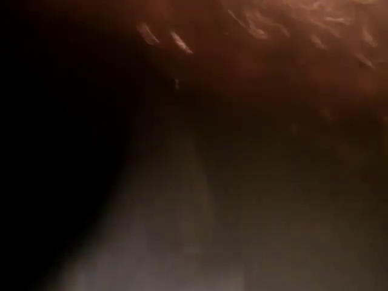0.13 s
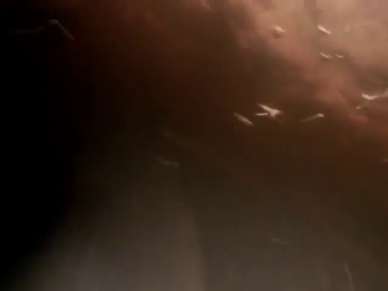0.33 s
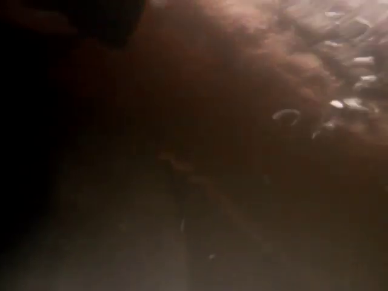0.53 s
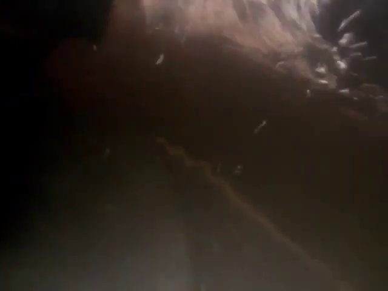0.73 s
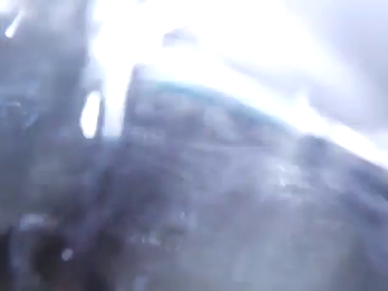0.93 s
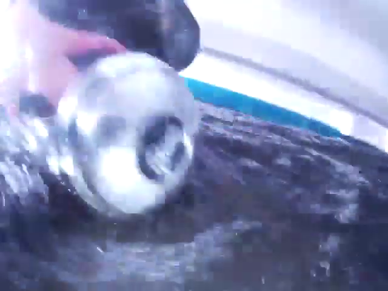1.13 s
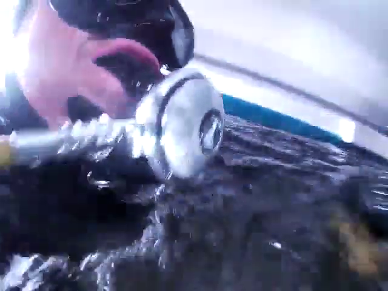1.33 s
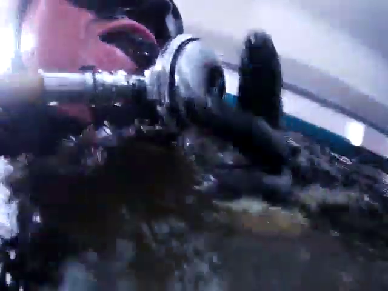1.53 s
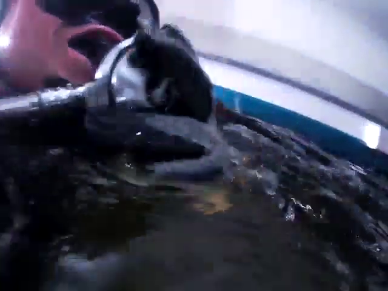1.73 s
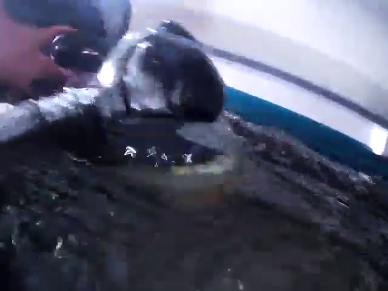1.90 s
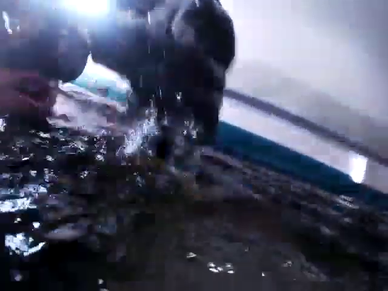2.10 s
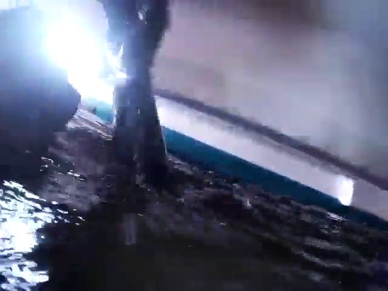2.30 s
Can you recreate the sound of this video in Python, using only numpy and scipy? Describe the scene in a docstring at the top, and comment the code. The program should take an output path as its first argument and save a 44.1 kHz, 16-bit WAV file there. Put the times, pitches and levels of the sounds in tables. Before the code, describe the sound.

Bubbling water, dull and rumbling, is heard close up from underwater. The microphone surfaces with a brief wash of runoff, and the sound turns brighter: small splashes and plops around a diver's equipment, then a light trickle.

```python
"""Churning water around a camera in a waterproof housing, which breaks the surface at about 0.9 s.
Below, bubbles ring as damped sines: large ones gurgle dully through the housing, tiny ones tick.
A thin whistle sounds near the surface, then the water drains off. Above, water sloshes and plops
around a diver's gear and a thin stream trickles down. Moving water rocks the housing throughout."""
import sys
import numpy as np
from scipy import signal
from scipy.fft import rfft, irfft
from scipy.io import wavfile
from scipy.ndimage import uniform_filter1d

SR = 44100
rng = np.random.default_rng(int(sys.argv[2]) if len(sys.argv) > 2 else 0)


def unload_audio(sound):
    """Save the sound as a 16-bit wav file, at the path given as the first command line argument."""
    columns = np.transpose(np.atleast_2d(sound))
    # keep every value between -1 and 1, then stretch to whole-number steps
    steps = np.round(np.clip(columns, -1, 1) * 32767)
    wavfile.write(sys.argv[1], SR, steps.astype(np.int16))


N = 108265
TIME_S = np.arange(N) / SR
SWELL_CYCLES, DEEP_SWELL_CYCLES, TICK_SWELL_CYCLES = 0.68, 2.24, 2.0
TICK_DECAY_S, GLIDE_PER_S = 0.0017, 0.21
WHISTLE_WOBBLE_HZ, WHISTLE_FLUTTER_DB = 217, 0.5
FADE_DB_PER_S, CUTOFF_HZ = 250, 14800

# Loudness of the bubble swarms. Each row: time in seconds, level in dB.
CHURN_LEVELS = [(0, -28), (.08, -32), (.14, -29), (.21, -35.5), (.3, -30), (.33, -29), (.39, -28),
                (.45, -32.5), (.51, -27), (.6, -29), (.67, -30), (.72, -36.5), (.77, -46), (.9, -54.5)]
FROTH_LEVELS = [(0, -58), (.06, -57), (.12, -53), (.2, -56), (.26, -50), (.285, -54), (.36, -52),
                (.44, -55), (.5, -44), (.62, -43), (.68, -41), (.74, -46), (.85, -51), (.95, -65)]
FIZZ_LEVELS = [(0, -69), (.18, -69), (.26, -66), (.36, -67), (.45, -70), (.6, -68), (.66, -64), (.72, -68),
               (.82, -73), (.95, -76)]
DRAIN_LEVELS = [(.72, -47.5), (.82, -54), (.92, -43.5), (1.01, -38), (1.07, -42), (1.11, -50.5),
                (1.16, -53.5), (1.24, -67)]
SLOSH_LEVELS = [(.95, -50.5), (1.18, -49.5), (1.25, -46), (1.33, -32.5), (1.42, -35), (1.48, -35),
                (1.53, -32.5), (1.61, -40), (1.68, -37), (1.74, -39.5), (1.83, -41), (1.9, -44),
                (1.95, -47), (2.02, -46), (2.16, -47.5), (2.3, -51), (2.37, -51.5), (2.43, -42)]
SPRAY_LEVELS = [(1.15, -67), (1.33, -70), (1.44, -53), (1.52, -52.5), (1.61, -64), (1.66, -53), (1.76, -73),
                (1.88, -66), (2.03, -68), (2.15, -65), (2.33, -71), (2.43, -57.5)]
# Filters that colour the swarms and noises. Each row: frequency in Hz, relative gain in dB.
CHURN_EQ = [(150, -20.5), (260, -5.5), (330, -4.5), (400, 2.5), (520, 1.5), (700, 3.5), (820, -6.5),
            (1000, -18), (1200, -39), (2000, -54.5), (4000, -90.5), (12000, -110)]
FROTH_EQ = [(600, -42.5), (1050, 13), (1300, 13.5), (1850, 6.5), (2050, -3.5), (2300, -8.5), (2700, -35),
            (3100, -25.5), (3800, -43.5), (6000, -58.5), (15000, -91)]
FIZZ_EQ = [(1500, -29), (2500, -3.5), (3100, 0.5), (3900, -15), (4600, -8.5), (5300, 0.5), (6300, -2),
           (7300, -2), (8700, -6.5), (10000, -5.5), (12000, -9.5), (13500, -29.5), (15000, -37)]
SWAY_EQ = [(3, -12.5), (10, 9), (16, -11.5), (30, 5.5), (55, -9), (90, -27.5), (200, -71.5), (1000, -110)]
RUMBLE_EQ = [(35, -13.5), (70, -2), (110, -2.5), (160, -7.5), (215, -2.5), (270, -14), (380, -28),
             (900, -31.5), (3000, -79.5), (10000, -120)]
SPATTER_EQ = [(500, -5), (2000, -8.5), (5000, 7), (8000, -14), (10500, -6), (13000, -26), (15000, -31)]
DRAIN_EQ = [(200, -5.5), (330, -0.5), (420, -15.5), (580, 4.5), (850, 2), (1150, -8), (1700, -7.5),
            (2500, -29.5), (4500, -25.5), (7000, -41.5), (10000, -42.5), (15000, -69)]
SLOSH_EQ = [(200, -1), (380, -15), (600, -12), (850, -3.5), (1100, -7.5), (1500, 3), (1900, 2),
            (2500, -4.5), (3500, -14), (5000, -23.5), (7000, -25), (10000, -40), (11500, -38.5),
            (15000, -72)]
SPRAY_EQ = [(1500, -23), (3500, -12), (5000, 9), (7000, -5), (10000, -4.5), (11500, -23), (13500, -19),
            (15000, -40)]
# Sustained tones. Each row: time in seconds, pitch in Hz, level in dB.
THROB_TRACK = [(0, 192, -16.5), (.02, 196, -16), (.04, 198, -17), (.055, 200, -36), (.075, 190, -27),
               (.09, 180, -45)]
WHISTLE_TRACK = [(.63, 7800, -85), (.66, 7700, -63), (.71, 6900, -72), (.77, 7500, -66), (.805, 7700, -80),
                 (.83, 7700, -64), (.88, 7250, -60), (.915, 7600, -63), (.94, 7300, -82)]
TRICKLE_TRACK = [(1.88, 1464, -60), (1.94, 1460, -44), (2.0, 1465, -45), (2.06, 1491, -42),
                 (2.14, 1502, -38), (2.21, 1506, -43), (2.28, 1488, -47), (2.36, 1400, -58)]
# Flow pressing on the housing. Each row: time in seconds, sway level in dB, rumble level in dB.
FLOW_LEVELS = [(0, -43, -21.5), (.1, -29.5, -28), (.3, -36.5, -28), (.45, -32, -35), (.6, -30.5, -29.5),
               (.79, -31, -37), (.88, -35, -42), (1.02, -37.5, -39), (1.18, -40, -52.5), (1.33, -36, -41),
               (1.46, -37, -40), (1.56, -38.5, -47), (1.8, -42.5, -49), (2.05, -35, -52.5),
               (2.16, -47, -52.5), (2.25, -32.5, -52.5), (2.32, -49, -57.5), (2.4, -27.5, -50)]
# Damped rings. Each row: start in seconds, pitch in Hz, peak level in dB, decay in seconds.
DEEP_BUBBLES = [(.048, 679, -22.5, 0.01), (.055, 682.4, -16.5, 0.0086), (.117, 897, -33, 0.023),
                (.14, 1005, -37, 0.013), (.304, 393, -19, 0.0023), (.315, 701, -12, .005),
                (.3247, 653, -21, 0.0089), (.327, 403, -20, 0.014), (.489, 1765, -37.5, .009),
                (.502, 605, -18.5, 0.0062), (.512, 1766, -38.5, 0.019), (.527, 710, -18, 0.0063),
                (.535, 1510, -41, .012), (.563, 611, -13.5, 0.0055), (.597, 717, -17, 0.0054),
                (.651, 1845, -22.5, 0.011), (.654, 750, -17, 0.0028), (.6632, 1700, -32, 0.0055),
                (.7023, 1305, -28, 0.011), (.773, 1390, -45, 0.027)]
SHOVES = [(.73, 25.5, -22.5, 0.027), (1.297, 26, -22.5, 0.049), (2.387, 48, -26.5, 0.0093),
          (2.391, 220, -28, 0.006)]  # swells hitting the housing
PLOPS = [(1.244, 1680, -26.5, 0.0091), (1.2758, 1480, -18, 0.00085), (1.276, 3370, -20, 0.0032),
         (1.317, 990, -23, 0.0073), (1.3525, 1618, -10, 0.0063), (1.37, 1620, -9, 0.0013),
         (1.3716, 2560, -16.5, 0.00055), (1.3764, 2680, -25, 0.0016), (1.3893, 2105, -15.5, 0.005),
         (1.3893, 1500, -19, 0.0026), (1.392, 1655, -27, 0.0071), (1.3979, 1120, -16.5, 0.0072),
         (1.3986, 1443, -6.5, 0.0019), (1.4013, 1537, -13.5, 0.0044), (1.4618, 2790, -26, 0.0026),
         (1.497, 1365, -24.5, 0.0045), (1.512, 1800, -23.5, 0.0067), (1.533, 1137, -23.5, 0.007),
         (1.5346, 1567, -25.5, 0.0092), (1.5685, 1232, -18, 0.013), (1.5686, 1110, -24.5, 0.0077),
         (1.569, 2700, -27.5, .002), (1.624, 1480, -32, 0.021), (1.6486, 1514, -20, .013),
         (1.648, 2300, -20, 0.0021), (1.672, 1850, -24, 0.007), (1.6852, 1544, -25, 0.012),
         (1.7409, 1338, -37.5, 0.037), (1.9288, 1450, -27, 0.0068), (1.9393, 2562, -28.5, 0.0039),
         (1.9537, 1553, -30, 0.0064), (2.3901, 1690, -23.5, 0.0012), (2.3982, 1835, -26.5, 0.0045),
         (2.424, 2100, -32.5, 0.0021)]
# Tiny bubbles and droplets. Each row: start in seconds, level in dB, pitch in Hz.
TICKS = [(.083, -58, 8000), (.104, -54, 3180), (.203, -45, 6220), (.224, -55, 6060), (.242, -56, 8500),
         (0.259, -47.5, 2550), (.267, -51, 5130), (.299, -51, 4460), (.313, -52, 3280), (.351, -44, 7740),
         (.354, -51.5, 2920), (.354, -53, 4580), (.3675, -51.5, 7200), (.391, -54, 8200),
         (.4095, -49, 8860), (.424, -57.5, 3100), (.488, -50.5, 6900), (.501, -47.5, 5060),
         (.586, -53.5, 8900), (.638, -36.5, 7310), (0.653, -37.5, 2910), (0.652, -39.5, 4870),
         (.707, -41.5, 5260), (0.712, -48.5, 2900), (.74, -62, 4760), (1.229, -42, 4530),
         (1.275, -38.5, 5600), (1.349, -50, 6700), (1.424, -42, 5900), (1.461, -34.5, 5900),
         (1.5134, -31, 7070), (1.529, -37, 4660), (1.5508, -30.5, 4040), (1.734, -47, 8100),
         (2.012, -40, 5600), (2.424, -44.5, 4900)]
# Sudden bursts. Each row: start in seconds, level in dB, decay in seconds.
BREAKUPS = [(.298, -33, 0.0074), (.32, -46, 0.0089), (.651, -36, 0.022)]  # air pockets breaking into froth
SPATTERS = [(.299, -55.5, 0.0022), (.652, -53, 0.0059), (1.2755, -51, 0.0018), (1.3485, -34, 0.0013),
            (1.513, -38, .004), (1.733, -49, 0.015), (2.0115, -53, 0.0028), (2.022, -47.5, 0.0069),
            (2.397, -49, 0.0026), (2.424, -43, 0.0024)]
SLAPS = [(1.243, -40.5, 0.013), (1.456, -36, 0.014), (1.648, -24.5, .017), (1.937, -37.5, 0.0086)]
# Filling air pockets. Each row: start and length in seconds, first and last pitch in Hz, level in dB.
GULPS = [(.33, 0.0995, 401.8, 477.5, -28), (0.469, 0.1, 370, 522.5, -27.5), (.56, 0.15, 520, 745, -28.5),
         (0.931, 0.065, 570, 611, -39.5), (1.47, .14, 543, 786, -38.5), (1.723, 0.182, 763, 778, -51),
         (2.162, 0.11, 480, 475, -56.5)]


def amp(db):
    """Decibels to gain."""
    return 10 ** (np.asarray(db) / 20)


def unit(x):
    """Scale to rms 1."""
    return x / np.sqrt(np.mean(x ** 2) + 1e-20)


def curve(rows, column=1):
    """One table column, interpolated over time."""
    rows = np.array(rows)
    return np.interp(TIME_S, rows[:, 0], rows[:, column])


def level(rows, column=1):
    """Gain from a dB curve, fading outside its span."""
    outside_s = np.maximum(rows[0][0] - TIME_S, 0) + np.maximum(TIME_S - rows[-1][0], 0)
    return amp(curve(rows, column) - FADE_DB_PER_S * outside_s)


def colour(x, eq):
    """Minimum-phase filter."""
    size = 2 ** 17
    hz, db = np.transpose(eq)
    bin_hz = abs(np.fft.fftfreq(size, 1 / SR))
    gain = amp(np.interp(np.log(bin_hz + 1), np.log(hz), db))
    response = np.exp(np.conj(signal.hilbert(np.log(gain))))[:size // 2 + 1]
    return irfft(rfft(x, size) * response)[:N]


def steady(x, span_s):
    """Hold rms near 1, keeping detail quicker than the span."""
    size = max(8, int(span_s * SR))
    power = uniform_filter1d(uniform_filter1d(x * x, size), size)
    return x / np.sqrt(abs(power) + 1e-12)


def wander(rate_hz):
    """Smooth noise of rms 1."""
    hz = np.fft.rfftfreq(N, 1 / SR)
    return unit(irfft(rfft(rng.standard_normal(N)) * np.exp(-(hz / rate_hz) ** 2), N))


def ring(hz, decay_s, swell_cycles):
    """One bubble: a damped sine that swells to peak 1 and creeps up in pitch."""
    t = np.arange(int(9 * decay_s * SR) + 8) / SR
    envelope = (1 - np.exp(-(t * hz / swell_cycles) ** 2)) * np.exp(-t / decay_s)
    return envelope / envelope.max() * np.sin(2 * np.pi * hz * (t + GLIDE_PER_S * t * t / 2))


def rings(rows, swell_cycles):
    """One damped ring per row."""
    out = np.zeros(N)
    for start_s, hz, db, decay_s in rows:
        sound = amp(db) * ring(hz, decay_s, swell_cycles)
        slot = out[round(start_s * SR):][:len(sound)]
        slot += sound[:len(slot)]
    return out


def swarm(eq, low_hz, high_hz, per_s, decay_cycles, spread_db, hiss):
    """Random bubbles of 36 sizes over turbulent hiss, rms near 1."""
    bubbles = np.zeros(N)
    for hz in np.geomspace(low_hz, high_hz, num=36):
        born = rng.random(N) < per_s / 36 / SR
        strength_db = spread_db * np.minimum(rng.exponential(1, N), 3.5)
        kicks = born * amp(strength_db) * rng.choice([-1, 1], N)
        bubble = ring(hz, decay_cycles / hz, SWELL_CYCLES)
        bubbles += np.sqrt(hz) * unit(signal.oaconvolve(kicks, bubble)[:N])
    turbulence = hiss * rng.standard_normal(N) * np.sqrt(SR / 2 / (high_hz - low_hz))
    return steady(colour(unit(bubbles) + turbulence, eq), span_s=0.047)


def bursts(rows, attack_s):
    """Envelope of sudden, decaying blows."""
    out = np.zeros(N)
    for start_s, db, decay_s in rows:
        age_s = np.maximum(TIME_S - start_s, 0)
        out += amp(db) * (1 - np.exp(-age_s / attack_s)) * np.exp(-age_s / decay_s)
    return out


def fuzzy_tone(pitch_hz, width_hz):
    """A randomly shaken cavity ringing along a pitch curve."""
    pole = np.exp(-np.pi * width_hz / SR)
    noise = rng.standard_normal(N) + 1j * rng.standard_normal(N)
    shake = signal.lfilter([1], [1, -2 * pole, pole * pole], noise)
    carrier = np.exp(2j * np.pi * np.cumsum(pitch_hz) / SR)
    return steady((shake * carrier).real, span_s=0.09)


def churning_water():
    """Large bubbles churn, smaller ones froth, the finest fizz."""
    churn = swarm(CHURN_EQ, 256.6, 949, per_s=900, decay_cycles=4.7, spread_db=2, hiss=0.33)
    froth = swarm(FROTH_EQ, 1046, 3236, per_s=700, decay_cycles=12, spread_db=5.5, hiss=0.19)
    fizz = swarm(FIZZ_EQ, 2400, 10000, per_s=900, decay_cycles=7, spread_db=4, hiss=0.45)
    froth_gain = level(FROTH_LEVELS) + bursts(BREAKUPS, attack_s=0.001)
    return churn * level(CHURN_LEVELS) + froth * froth_gain + fizz * level(FIZZ_LEVELS)


def throb():
    """A large air pocket pulses against the housing."""
    return np.sin(2 * np.pi * np.cumsum(curve(THROB_TRACK)) / SR) * level(THROB_TRACK, column=2)


def housing():
    """Moving water sways, rumbles and shoves the housing."""
    sway = steady(colour(rng.standard_normal(N), SWAY_EQ), span_s=0.16)
    rumble = steady(colour(rng.standard_normal(N), RUMBLE_EQ), span_s=0.046)
    shoves = rings(SHOVES, SWELL_CYCLES)
    return sway * level(FLOW_LEVELS) + rumble * level(FLOW_LEVELS, column=2) + shoves


def deep_bubbles():
    """Bubbles ring as they pinch off under water."""
    return rings(DEEP_BUBBLES, DEEP_SWELL_CYCLES)


def ticks():
    """Tiny bubbles and droplets tick on the housing."""
    return rings([(start_s, hz, db, TICK_DECAY_S) for start_s, db, hz in TICKS], TICK_SWELL_CYCLES)


def spatter():
    """Drops burst on the housing."""
    return unit(colour(rng.standard_normal(N), SPATTER_EQ)) * bursts(SPATTERS, attack_s=0.0001)


def gulps():
    """Air pockets ring as water runs in, most rising in pitch."""
    out = np.zeros(N)
    for start_s, length_s, first_hz, last_hz, db in GULPS:
        fill = np.clip((TIME_S - start_s) / length_s, 0, 1)
        pitch_hz = first_hz + (last_hz - first_hz) * fill
        out += amp(db) * np.sin(np.pi * fill) * fuzzy_tone(pitch_hz, width_hz=57)
    return out


def whistle():
    """A thin, raspy whistle wavers as the surface nears."""
    pitch_hz = curve(WHISTLE_TRACK) + WHISTLE_WOBBLE_HZ * wander(rate_hz=50)
    tone = fuzzy_tone(pitch_hz, width_hz=500)
    flutter = amp(WHISTLE_FLUTTER_DB * wander(rate_hz=120))
    return tone * level(WHISTLE_TRACK, column=2) * flutter


def drain():
    """A sheet of water runs off the housing."""
    sheet = swarm(DRAIN_EQ, 448, 7700, per_s=3800, decay_cycles=2.9, spread_db=2.5, hiss=0.95)
    return sheet * level(DRAIN_LEVELS)


def sloshing():
    """Surface water sloshes, slaps and throws fine spray."""
    slosh = swarm(SLOSH_EQ, 603.2, 9014, per_s=2200, decay_cycles=11.4, spread_db=4, hiss=0.65)
    spray = swarm(SPRAY_EQ, 3000, 12000, per_s=900, decay_cycles=2.5, spread_db=5, hiss=0.85)
    slosh_gain = level(SLOSH_LEVELS) + bursts(SLAPS, attack_s=0.00079)
    return slosh * slosh_gain + spray * level(SPRAY_LEVELS)


def plops():
    """Surface bubbles swell within about one cycle and ring out."""
    return rings(PLOPS, SWELL_CYCLES)


def trickle():
    """A thin stream falls on the surface with a fuzzy note."""
    return fuzzy_tone(curve(TRICKLE_TRACK), width_hz=166) * level(TRICKLE_TRACK, column=2)


def scene():
    """All the water, in mono."""
    below = churning_water() + throb() + deep_bubbles() + whistle()
    water = below + drain() + sloshing() + spatter() + plops() + trickle() + gulps() + ticks()
    return (water + housing())[None]


def record(dry):
    """Low-pass at CUTOFF_HZ."""
    taps = signal.firwin(511, CUTOFF_HZ, window=("kaiser", 9), fs=SR)
    return signal.oaconvolve(dry, taps[None], "same")


dry = scene()
out = record(dry)
unload_audio(out)
```